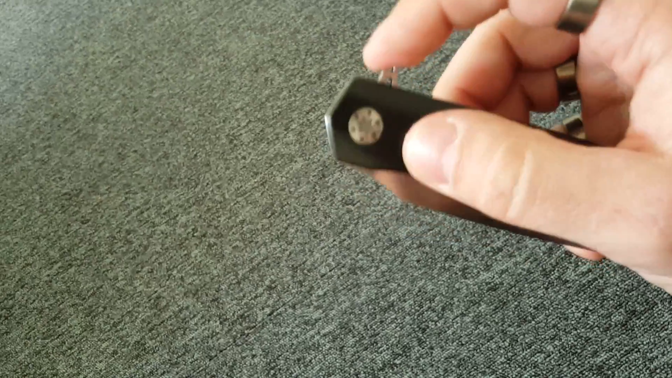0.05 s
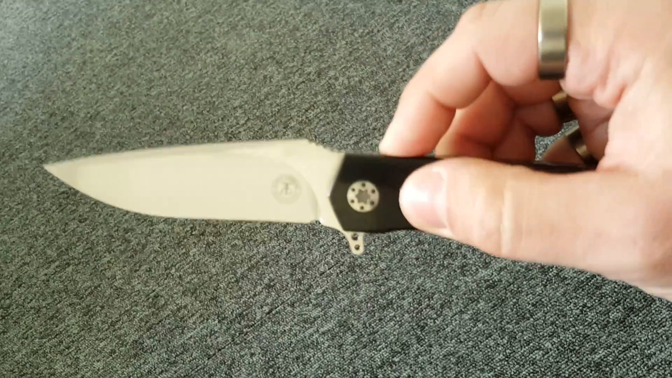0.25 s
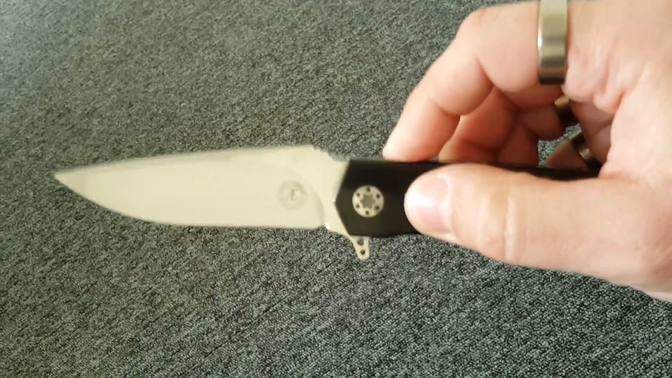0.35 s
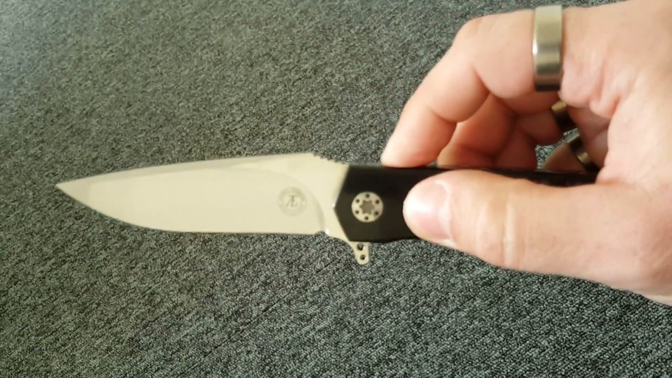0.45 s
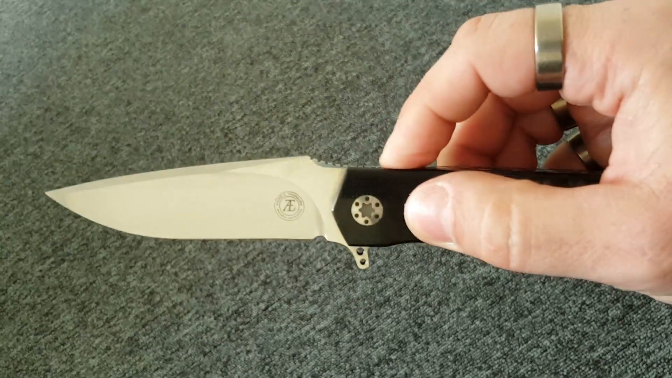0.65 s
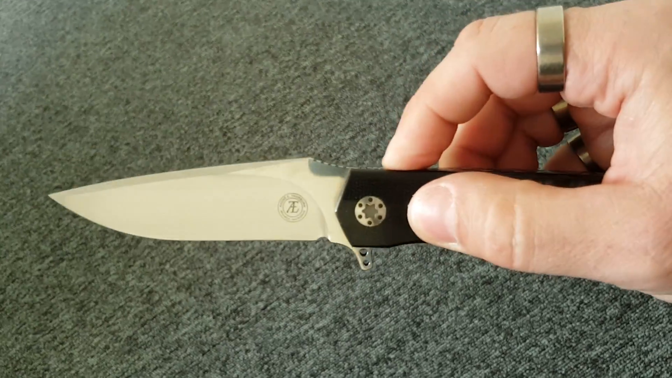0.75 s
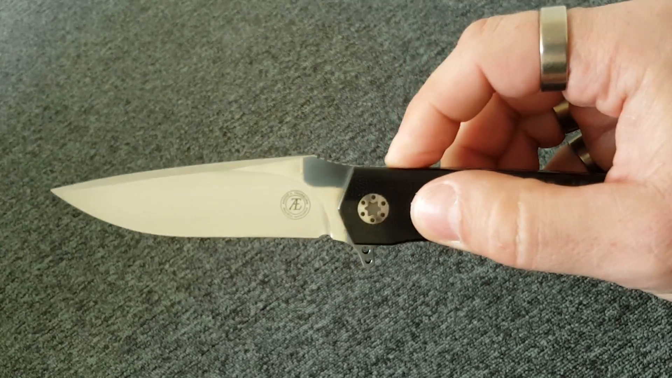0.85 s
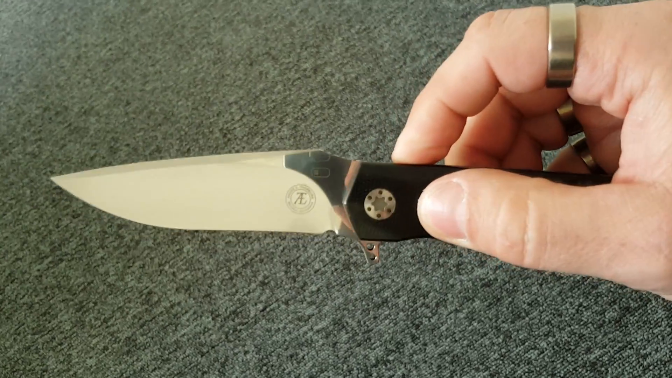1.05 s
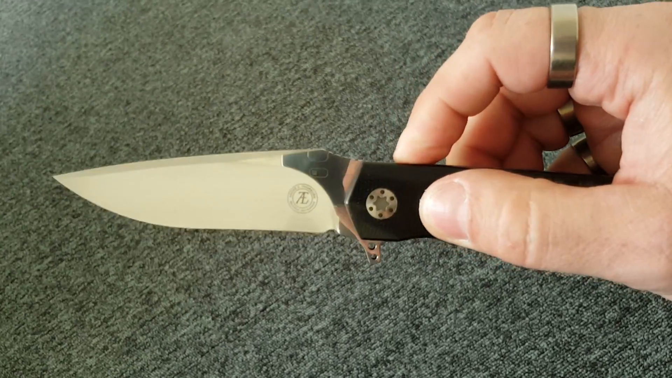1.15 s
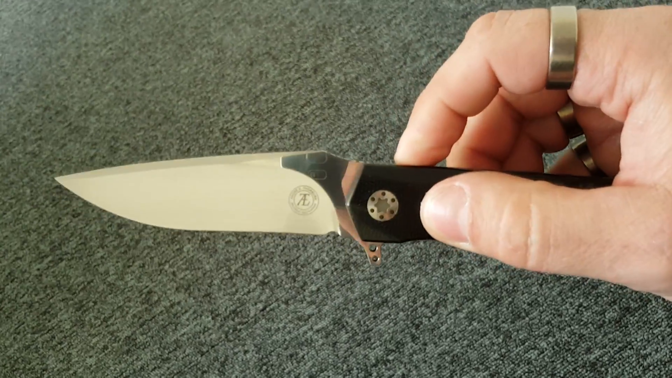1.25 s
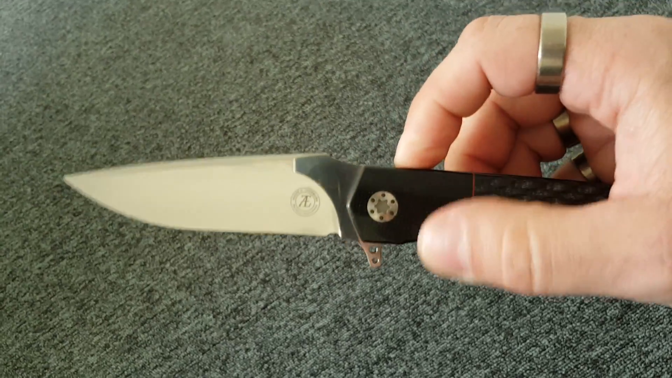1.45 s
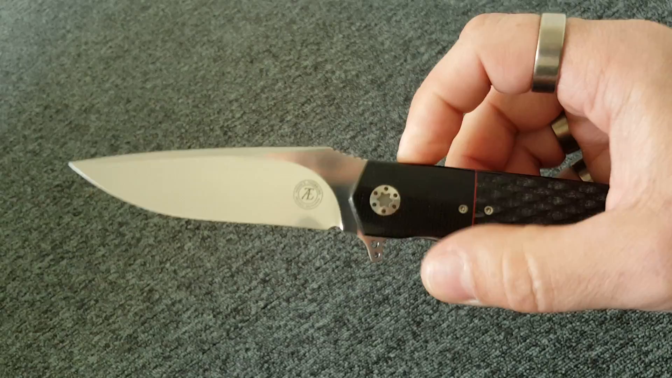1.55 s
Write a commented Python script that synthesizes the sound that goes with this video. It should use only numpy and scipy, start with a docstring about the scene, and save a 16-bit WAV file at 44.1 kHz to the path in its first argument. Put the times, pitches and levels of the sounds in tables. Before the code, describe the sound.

A folding knife flicks open, very close. Faint low wavering hum and soft room rumble begin alone; around 0.13-0.2 s light ticks and a quiet, rough rising scrape lead to a thin lock click and loud, bright metallic clack at 0.21 s. Thin steel tones and small-room reverberation fade within about half a second. The hum dips after the clack, then slowly swells back; a tiny tick comes near 1.46 s.

```python
"""A folding knife is flicked open close to the microphone in a small quiet room with a faint wavering hum.
A light tick starts the blade swishing round its pivot: random slips excite damped modes under a rising squeak.
The lock snaps over, then the blade slams on its stop pin: impulses ring modes, with noise bursts for the crack.
Blade tones and the room's reverberation die away as shaped noise; one more light tick comes near the end.
The recorder's gain control ducks everything, hum included, after the clack and lets it swell back."""
import sys
import numpy as np
from scipy import signal
from scipy.fft import rfft, irfft
from scipy.io import wavfile
from scipy.ndimage import minimum_filter1d

SR = 44100
rng = np.random.default_rng(int(sys.argv[2]) if len(sys.argv) > 2 else 0)


def to_wav(s):
    """Save 16-bit WAV."""
    ch = np.atleast_2d(s).T  # columns
    pcm = np.round(np.clip(ch, -1, 1) * 32767)  # PCM
    wavfile.write(sys.argv[1], SR, pcm.astype(np.int16))


N = 70560
TIME = np.arange(N) / SR
FREQS = np.fft.rfftfreq(N, 1 / SR)


def from_db(db):
    """Amplitude gain is ten to the power of decibels over twenty."""
    return 10 ** (np.asarray(db) / 20)


def rms_one(x):
    """Normalise the root-mean-square amplitude to 1."""
    return x / np.sqrt(np.mean(x ** 2) + 1e-20)


def at_hz(points, hz):
    """Interpolate a spectrum on a logarithmic frequency axis, as the ear spaces pitch."""
    point_hz, value = np.transpose(points)
    return np.interp(np.log(np.maximum(hz, 1)), np.log(point_hz), value)


def panned(pan_db):
    """Interaural level difference: left minus right dB, split evenly between the channels."""
    return from_db(np.array([[.5], [-.5]]) * pan_db)


def noise(spectrum, width=((20, 0), (20000, 0))):
    """Filtered noise of rms 1; the side-to-mid ratio sets its stereo width at each frequency."""
    mid, side = rfft(rng.standard_normal((2, N))) * from_db(at_hz(spectrum, FREQS))
    side = side * from_db(at_hz(width, FREQS))
    return rms_one(irfft(np.array([mid + side, mid - side]), N))


def drift(rate_hz):
    """Low-pass noise: slow random motion of zero mean and rms 1."""
    lowpass = np.exp(-(FREQS / rate_hz) ** 2) * (FREQS > 0)
    return rms_one(irfft(rfft(rng.standard_normal(N)) * lowpass, N))


def dying(t60_s):
    """Exponential decay from 1: the level falls 60 dB in t60."""
    return from_db(-np.minimum(60 * TIME / t60_s, 300))


def through(x, response):
    """Linear system: convolve the excitation with an impulse response."""
    return signal.fftconvolve(np.atleast_2d(x), np.atleast_2d(response), axes=1)[:, :N]


def ringing(modes):
    """Modal superposition: damped sines whose left-right phase gap follows their likeness."""
    usual_likeness = .5  # cosine of the phase gap, for modes that give none
    out = 0
    for k, (hz, db, t60_s, *likeness) in enumerate(modes):
        cosine = np.clip(likeness[0] if likeness else usual_likeness, -1, 1)
        phase = np.arccos(cosine) * np.array([[.5], [-.5]])
        sign = (-1) ** k
        out = out + sign * from_db(db) * dying(t60_s) * np.sin(2 * np.pi * hz * TIME + phase)
    return out


def clicks(touches):
    """Impulsive excitation: each contact is a single-sample stereo impulse."""
    out = np.zeros((2, N))
    for start_s, db, pan_db in touches:
        out[:, int(start_s * SR)] += from_db(db) * panned(pan_db)[:, 0]
    return out


def stop():
    """Impact excitation: the blade chatters on its stop and rings modes damped by the hand."""
    # contacts of blade and stop pin: start_s, level_db, pan_db
    stop_touches = [(.2096, -21, -0.5), (.21097, -11, -1.5), (.21183, -14, 3.5), (.21242, -5.5, 4.5),
                    (.21308, -10, -0.5), (.21414, -14.5, -5)]
    # modes of blade and handle together: pitch_hz, level_db, t60_s, likeness (left-right, clipped to -1..1)
    body_modes = [(1521, -24, 0.0104, -0.72), (1960, -19.0, 0.024, -1.3), (2606, -10.5, 0.027, 1.0),
                  (3092, -10.5, 0.019, 0.631), (3737, 1.2, 0.0087, 1.0), (3965, -19, 0.01, -1.2),
                  (4780, 4.5, 0.0059, -0.68), (5190, -7, 0.0048, 1), (5870, -18, 0.041, -0.76),
                  (6340, -2.5, 0.0023, -0.15), (6940, -12.5, 0.021, 1.0), (8160, -15, 0.0095, 0.99),
                  (8666, -16.5, 0.042, 1.0), (9140, -18.5, 0.041, -1.4), (9930, -12, 0.031, -0.89),
                  (13500, -17, 0.011, 1), (14880, -19, 0.0057, 0.02)]
    crack_db = -1.5
    return through(clicks(stop_touches), ringing(body_modes)) + from_db(crack_db) * crack(stop_touches)


def lock():
    """Impact excitation: the lock bar springs in behind the blade with a thin bright click."""
    # contacts of the lock bar: start_s, level_db, pan_db
    lock_touches = [(.2042, -20, -0.5), (.2049, -18.5, 2), (.2068, -32.5, -3.5)]
    # modes of the lock bar: pitch_hz, level_db, t60_s
    lock_modes = [(1120, -14.5, .014), (3162, -9, 0.0027), (3600, 1, .012), (4570, 1.5, .008),
                  (5370, -8, 0.0022), (8900, -6.5, 0.0017), (8947, -8.5, .005), (12475, -12.5, 0.0077),
                  (14400, -6, 0.0037), (15300, -13.5, .005)]
    crack_db = -6
    return through(clicks(lock_touches), ringing(lock_modes)) + from_db(crack_db) * crack(lock_touches)


def crack(touches):
    """High modal density: countless overlapping modes merge into a decaying noise burst per contact."""
    # colour of the burst: pitch_hz, level_db (per Hz)
    crack_spectrum = [(100, -20), (250, -10.5), (450, -12), (700, -7.5), (1000, -12.5), (1500, -3),
                      (2300, -3), (3500, 3.5), (5000, 2.5), (7500, -5), (10000, -4), (11500, -15),
                      (15500, -11.5)]
    # stereo width of the burst: pitch_hz, side_minus_mid_db
    crack_width = [(300, -12.5), (1500, -6), (4000, 1), (12000, -2)]
    # where the burst lies, its low part to the left: pitch_hz, left_minus_right_db
    crack_pan = [(200, 3), (600, 10), (1400, 8), (2800, 0), (12000, -2)]
    t60_s = .009
    # the powers of separate contacts add
    power = through(clicks(touches) ** 2, dying(t60_s) ** 2)
    spectrum = rfft(noise(crack_spectrum, crack_width))
    burst = irfft(spectrum * panned(at_hz(crack_pan, FREQS)), N)
    return np.sqrt(np.maximum(power, 0)) * burst


def swing():
    """Stick-slip friction: tiny slips excite the pivot, a rough squeak rises, and light ticks stand out."""
    # the blade rubbing round its pivot: start_s, level_db
    swing_level = [(.118, -82.5), (.131, -71.5), (.147, -56.5), (.156, -54), (.165, -60), (.18, -59.5),
                   (.192, -61), (.203, -57.5), (.21, -91)]
    # resonances of the rubbing pivot: pitch_hz, level_db, t60_s
    pivot_modes = [(1495, -5.5, .002), (3800, 0.5, .004), (5000, -7, 0.0094), (6850, -6.5, 0.0064),
                   (8200, -4, .003), (12450, -11.5, .014), (13800, -17.5, .005)]
    # light ticks of the detent and the handle: start_s, level_db
    ticks = [(.135, -49.5), (0.1567, -45), (0.157, -37), (1.461, -57.5)]
    # modes of the ticks: pitch_hz, level_db, t60_s
    tick_modes = [(1700, -6.5, 0.0061), (3060, -3.5, .011), (3975, -2.5, .011)]
    slips_per_s, slip_spread_db = 2200, 3.5
    squeak_start_hz, squeak_rise_hz_per_s, squeak_width_hz, squeak_db = 3407, 14000, 350, -1
    begin_s, end_s = swing_level[0][0], swing_level[-1][0]

    slip_now = rng.random(N) < slips_per_s / SR
    slip_gain = from_db(slip_spread_db * rng.standard_normal(N))
    slips = slip_now * slip_gain * rng.standard_normal((2, N))
    rub = rms_one(through(slips, ringing(pivot_modes)))

    turning_s = np.clip(TIME, begin_s, end_s) - begin_s
    squeak_hz = squeak_start_hz + squeak_rise_hz_per_s * turning_s
    # random modulation spreads the tone into a rough band
    squeak = drift(squeak_width_hz) * np.sin(2 * np.pi * np.cumsum(squeak_hz) / SR)

    level = from_db(np.interp(TIME, *np.transpose(swing_level)))
    level = level * (TIME > begin_s) * (TIME < end_s)
    rubbing = level * (rub + from_db(squeak_db) * rms_one(squeak))
    centred_ticks = [(start_s, db, 0) for start_s, db in ticks]
    return rubbing + through(clicks(centred_ticks), ringing(tick_modes))


def afterring():
    """Narrow-band noise beats: the blade's lingering tones flutter as they decay in the room."""
    # tones of the blade: pitch_hz, width_hz, level_db, t60_s
    blade_tones = [(3220, 130, -45.5, .52), (4750, 170, -39, .6), (6875, 45, -49, .18),
                   (8460, 35, -41.5, .36)]
    start_s = .2126
    bands = 0
    for hz, width_hz, db, t60_s in blade_tones:
        white = rfft(rng.standard_normal((2, N)))
        band = irfft(white * np.exp(-((FREQS - hz) / width_hz) ** 2), N)
        bands = bands + from_db(db) * dying(t60_s) * rms_one(band)
    return through(clicks([(start_s, 0, 0)]), bands)


def room(x):
    """Statistical reverberation: dense early reflections, then a diffuse tail that dies band by band."""
    # reverberation time: pitch_hz, t60_s
    room_t60 = [(200, 0.9), (1000, 0.74), (2500, .5), (4500, 0.6462), (6000, 0.59), (8000, 0.4237),
                (15000, 0.35)]
    # colour of the reflections: pitch_hz, level_db (per Hz)
    room_colour = [(200, -8), (700, -5), (1300, -6), (2100, 0), (2700, 3), (3500, -4), (5000, -3),
                   (8000, -5), (10000, -3.5), (12000, 1.5), (15500, -1.5)]
    tail_db, early_db, early_t60_s = -13.5, -3.5, .11
    first_wall_s, build_up_s = .005, .0062
    diffuse = rfft(noise(room_colour))
    centres_hz = np.geomspace(200, 16000, 10)
    tail = 0
    for hz, own in zip(centres_hz, np.eye(len(centres_hz))):
        # triangular crossfades between neighbouring bands
        weight = at_hz(np.c_[centres_hz, own], FREQS)
        tail = tail + irfft(diffuse * weight, N) * dying(at_hz(room_t60, hz))
    early = noise(room_colour) * dying(early_t60_s)
    response = from_db(tail_db) * rms_one(tail) + from_db(early_db) * rms_one(early)
    response = response / np.sqrt(N)  # from unit rms to unit energy
    response = response * (1 - np.exp(-TIME / build_up_s))
    delayed = np.pad(response, ((0, 0), (int(first_wall_s * SR), 0)))
    return through(x, delayed)


def background():
    """Steady sources: hum partials waver in level and pitch over noise of low room rumble and faint hiss."""
    # partials of the hum: pitch_hz, level_db (rms, before waver, swell and pan)
    hum_partials = [(65, -56), (182.5, -52), (291.5, -56.5), (555, -80.5), (641, -72.5)]
    # the hum swells and sinks: start_s, level_db
    hum_swell = [(0, -3.5), (.15, 0.5), (.4, -0.5), (.9, -2), (1.1, 1.5), (1.24, 2), (1.35, -1), (1.5, 1),
                 (1.6, -0.5)]
    # room air and microphone hiss: pitch_hz, level_db (per Hz)
    air_spectrum = [(20, -1.5), (40, 0), (70, -2), (125, -2), (220, -7.5), (320, -11.5), (430, -19.5),
                    (650, -18), (1000, -25.5), (2000, -34), (4000, -43.5), (8000, -52), (12000, -50.5),
                    (15000, -46.5)]
    # stereo width of the air: pitch_hz, side_minus_mid_db
    air_width = [(50, -17), (250, -11.5), (700, -3), (3000, 1), (12000, 0)]
    waver_db, wander_hz = 1.5, 1.8
    air_db, pan_db = -50, -1.2
    hum = 0
    for hz, db in hum_partials:
        gain = from_db(db + waver_db * drift(11))
        phase = 2 * np.pi * np.cumsum(hz + wander_hz * drift(24)) / SR
        hum = hum + gain * np.sqrt(2) * np.sin(phase)  # root 2 turns rms into peak
    hum = hum * from_db(np.interp(TIME, *np.transpose(hum_swell)))
    return panned(pan_db) * (hum + from_db(air_db) * noise(air_spectrum, air_width))


def scene():
    """Superposition: the knife's direct sound, its reverberation, its lingering tones and the background add."""
    knife = swing() + lock() + stop()
    return knife + room(knife) + afterring() + background()


def record(dry):
    """Dynamic compression: gain ducks on a loud peak, holds and recovers; peaks round and the top is cut."""
    threshold_db, max_duck_db = -14.5, 6.5
    attack_s, hold_s, release_db_per_s = .045, .46, 12.5
    cutoff_hz = 15900
    peak_db = 20 * np.log10(np.abs(dry).max(0) + 1e-9)
    over_db = np.clip(peak_db - threshold_db, 0, max_duck_db)
    hold = int(hold_s * SR)
    # running maximum over the hold time
    held_db = -minimum_filter1d(-over_db, hold, origin=(hold - 1) // 2, mode="constant")
    # the duck may fall no faster than the release slope
    slope_db = release_db_per_s * TIME
    duck_db = np.maximum.accumulate(held_db + slope_db) - slope_db
    r = np.exp(-1 / (attack_s * SR))
    smooth_db = signal.lfilter([1 - r], [1, -r], duck_db)
    out = np.tanh(dry * from_db(-smooth_db))
    return signal.sosfilt(signal.ellip(10, .1, 70, cutoff_hz, fs=SR, output="sos"), out)


dry = scene()
out = record(dry)
to_wav(out)
```